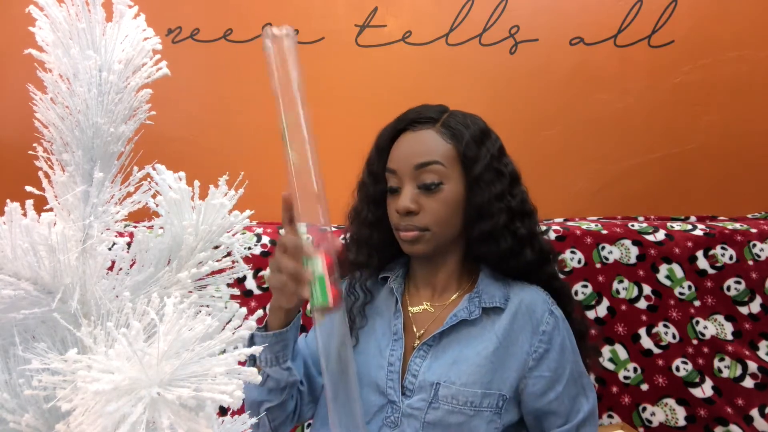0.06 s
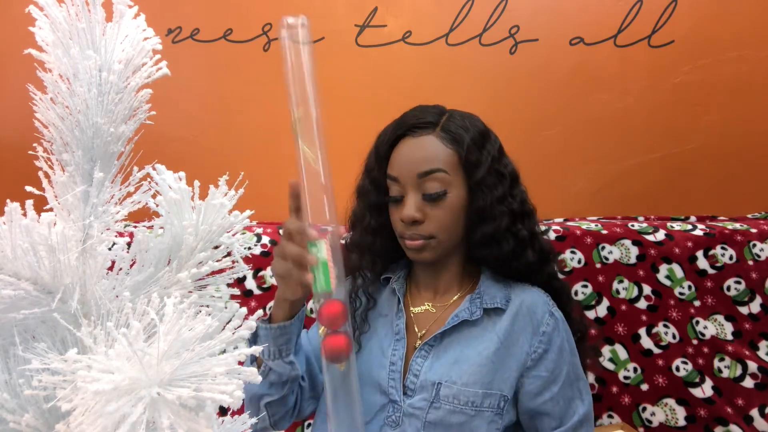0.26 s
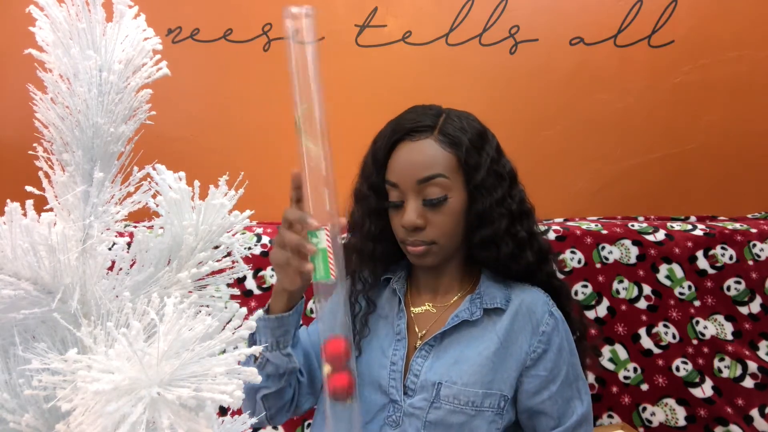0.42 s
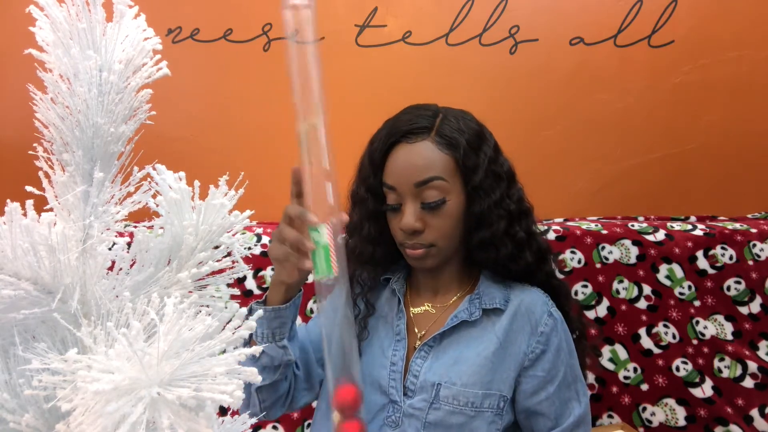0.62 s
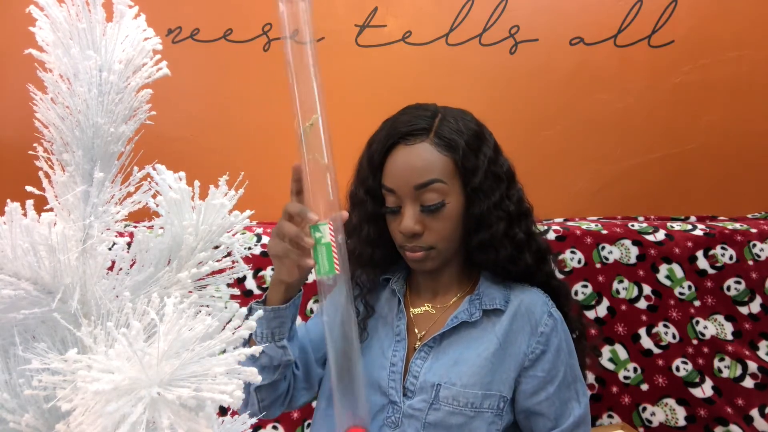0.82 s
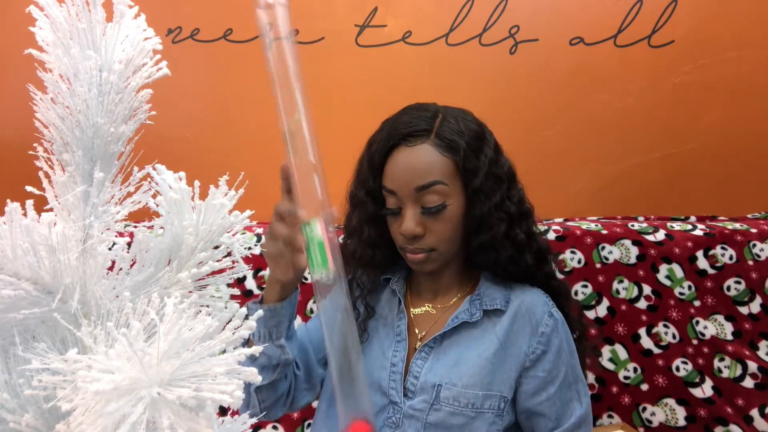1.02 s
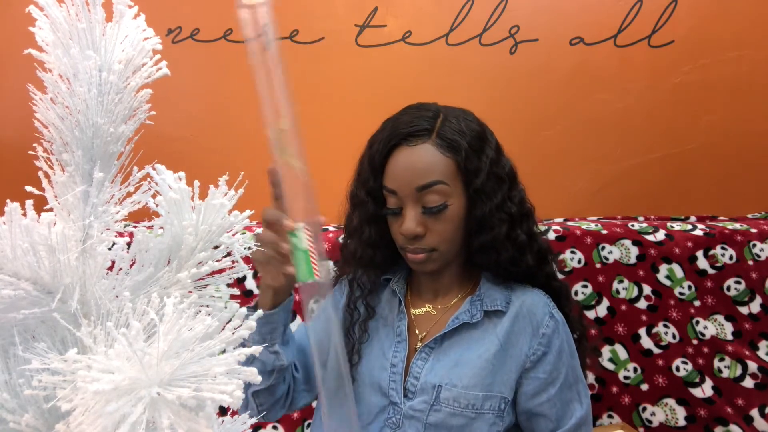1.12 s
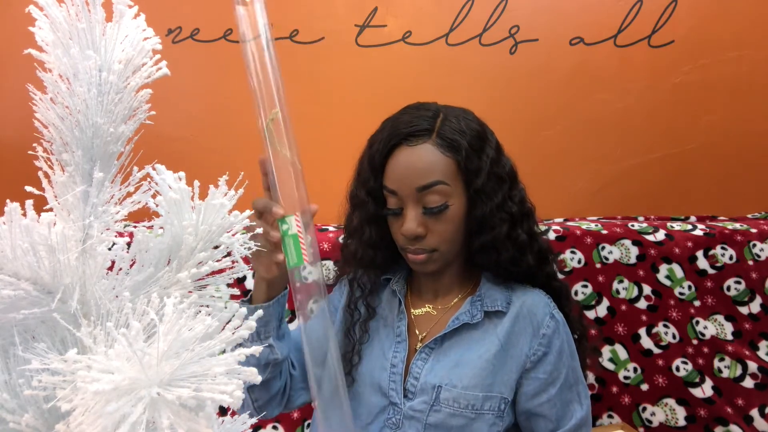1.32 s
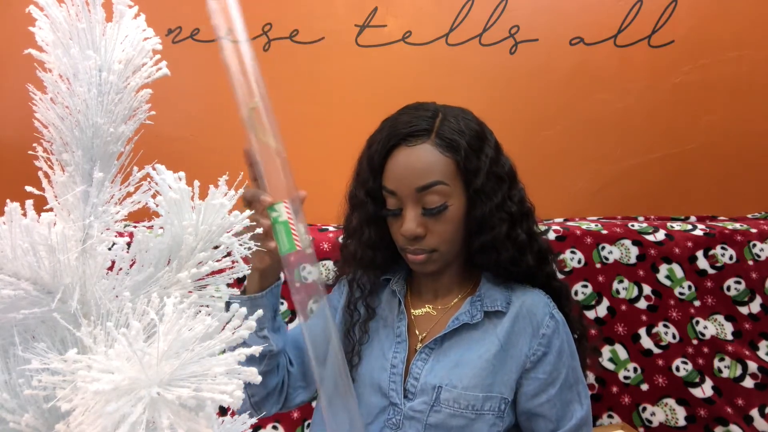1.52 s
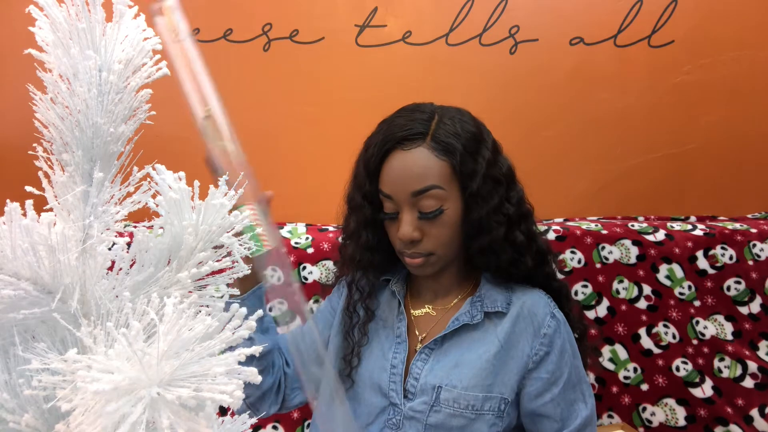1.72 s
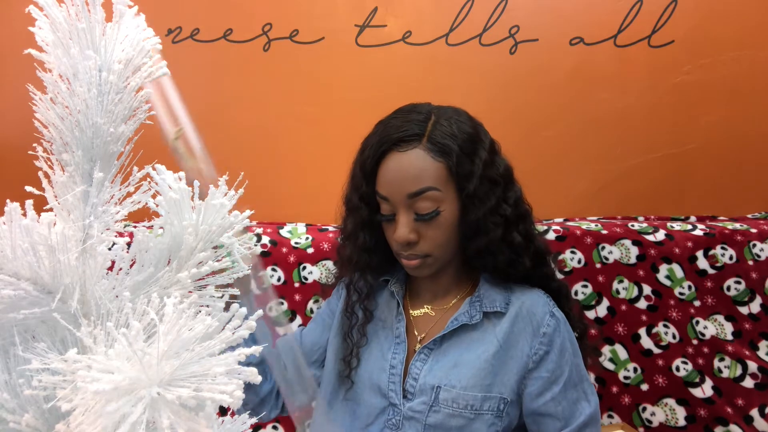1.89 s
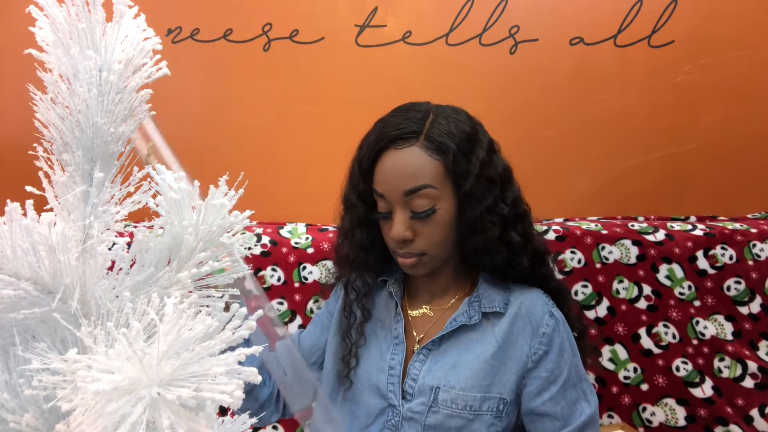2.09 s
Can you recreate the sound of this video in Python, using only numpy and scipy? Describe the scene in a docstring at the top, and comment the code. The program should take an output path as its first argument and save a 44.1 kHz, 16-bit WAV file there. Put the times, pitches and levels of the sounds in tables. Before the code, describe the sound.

Small hollow plastic balls knock and roll down a long plastic tube, then one clacks out

```python
"""Plastic balls in a long tube

Small hollow plastic ornament balls slip down a long plastic tube, tipped by hand in a quiet, small furnished room.
Their knocks, rolls and scrapes are clicks, tiny grains and noise that drive resonances, with echoes along the tube.
Near the end a ball drops out with a bright clack, chattering noise over a broad body; a few lighter ones follow.
"""
import sys
import numpy as np
from scipy import signal
from scipy.fft import rfft, irfft
from scipy.io import wavfile
from scipy.ndimage import uniform_filter1d, map_coordinates

SR = 44100
rng = np.random.default_rng(int(sys.argv[2]) if len(sys.argv) > 2 else 0)


def wav_out(sig):
    """Save sig, one row per channel (or a flat mono array), as 16-bit PCM at SR to the path in sys.argv[1]."""
    wavfile.write(sys.argv[1], SR, np.round(np.clip(np.atleast_2d(sig).T, -1, 1) * 32767).astype(np.int16))


N = 94815
TIME = np.arange(N) / SR  # s
CUTOFF_HZ = 16300  # top of the grains' bands; the microphone's top is cut just below

# Balls knock in the tube: (time [s], hollow pock level [dB], pock pitch [Hz],
# tube thud level [dB], thud pitch [Hz], shell click level [dB])
KNOCKS = [(.002, -33, 1550, -42.5, 407, -50), (0.0911, -27.5, 1780, -46, 443, -65),
          (0.2091, -18.5, 1800, -42, 480, -34.5), (0.2286, -23.5, 1780, -32.5, 463, -65.5),
          (0.381, -24, 1740, -35, 375, -36), (0.414, -7, 1730, -21, 385, -28),
          (0.5004, -38, 1780, -36, 336, -84), (0.5268, -25, 1800, -27.5, 359, -53),
          (0.5392, -25, 1820, -33, 390, -39.5), (0.603, -48, 1780, -26.5, 341, -41.5),
          (.637, -22, 1720, -34, 300, -63), (0.703, -31, 1900, -79, 347, -48),
          (0.7155, -2.5, 1780, -23.5, 337, -20), (0.7396, -7, 1740, -20, 338, -33),
          (0.7973, -14, 1810, -41, 347, -47.5), (0.8243, -14.5, 1760, -43, 302, -33.5),
          (0.8334, -17.5, 1800, -37.5, 314, -43.5), (0.97, -53, 1900, -47, 357, -85.5),
          (1.068, -42, 1780, -25, 363, -52), (1.0859, -24, 1790, -21, 331, -33.5),
          (1.1288, -15, 1810, -19.5, 331, -33.5), (1.1594, -17.5, 1950, -23.5, 356, -42),
          (1.1726, -23, 1900, -46, 360, -42)]
# Resonance of the hollow ball: (frequency [Hz], relative level [dB])
POCK_CURVE = [(100, -61.5), (700, -50.5), (1100, -33), (1400, -4.5), (1650, 4.5), (1900, 4.5), (2200, -6.5),
              (2500, -16.5), (3000, -49.5), (5000, -91.5)]
POCK_HZ = 1780  # centre of POCK_CURVE; the spot that is struck shifts it
# Resonance of the thin shell: (frequency [Hz], relative level [dB])
SHELL_CURVE = [(200, -52), (1000, -32.5), (3300, -20), (4600, 6), (5400, -19.5), (6900, -14.5), (7900, 7),
               (9000, -3.5), (9700, -0.5), (10600, -5), (11500, -3), (13700, -8), (16000, -21)]
# Bright crack of a hard hit: (frequency [Hz], relative level [dB])
CRACK_CURVE = [(200, -45.5), (1800, -35), (2300, -10.5), (2700, 2), (3700, -1), (4600, -1), (5500, -7),
               (6400, -1), (7100, -6), (7950, 8.5), (9000, -1.5), (11200, 0), (13500, -2.5), (16000, -13)]
# Broad body under the crack: (frequency [Hz], relative level [dB])
BODY_CURVE = [(30, -63), (80, -28), (200, -18), (400, -3.5), (800, -1.5), (1100, -6), (1400, -1.5),
              (1900, 1.5), (2600, -15), (4500, -50), (9000, -49)]


def from_db(db):
    """Decibels to gain."""
    return 10 ** (np.asarray(db) / 20)


def unit_energy(x):
    """Scale to a summed square of one."""
    return x / np.sqrt(np.sum(x ** 2) + 1e-20)


def at_hz(points, hz):
    """Read a table on a log-frequency axis."""
    f, value = np.transpose(points)
    return np.interp(np.log(np.maximum(hz, 1)), np.log(f), value)


def ring(x, spectrum, size=4096):
    """Drive a body with a resonance curve, as a causal minimum-phase response of unit energy."""
    gain = from_db(at_hz(spectrum, np.fft.rfftfreq(size, 1 / SR)))
    cepstrum = irfft(np.log(gain))
    # Folding the cepstrum onto positive time makes the response causal.
    cepstrum[1:size // 2] *= 2
    cepstrum[size // 2 + 1:] = 0
    response = unit_energy(irfft(np.exp(rfft(cepstrum))))
    return signal.fftconvolve(x, response)[:N]


def shifted(x, spectrum, ratio):
    """Drive a body whose resonances are all moved by one ratio."""
    return ring(x, [(hz * ratio, db) for hz, db in spectrum])


def blows(times, db):
    """One single-sample click for each contact."""
    out = np.zeros(N)
    places = np.clip(np.asarray(times) * SR, 0, N - 1).astype(int)
    out[places] = from_db(db)
    return out


def cracks(times, db, chatter_s):
    """A hard contact chatters as a burst of noise that swells until chatter_s, then dies."""
    out = np.zeros(N)
    for s, level_db, noise in zip(times, db, rng.standard_normal((len(times), 512))):
        age = np.arange(len(noise)) / SR / chatter_s
        burst = unit_energy(noise * age * np.exp(-age))
        i = int(s * SR)
        out[i:i + len(burst)] += from_db(level_db) * burst[:N - i]
    return out


def grains(per_s, spread_db, patchy_db, count=26):
    """Random tiny contacts, each in a narrow band; the favoured bands change as the contact moves; rms 1."""
    patch_s = .014  # spacing of the random changes in each band's level
    hz = np.fft.rfftfreq(N, 1 / SR)
    place = count * np.sqrt(hz / CUTOFF_HZ)
    out = 0
    for k in range(count + 1):
        sizes = from_db(spread_db * np.minimum(rng.exponential(1, N), 4))
        signs = rng.choice([-1, 1], N)
        favour = from_db(patchy_db * np.interp(TIME / patch_s, np.arange(N), rng.standard_normal(N)))
        hits = rng.random(N) < per_s / SR
        band = np.cos(np.pi / 2 * np.clip(place - k, -1, 1))
        out = out + band * rfft(sizes * signs * favour * hits)
    return unit_energy(irfft(out, N)) * np.sqrt(N)


def stroke(start, length, db, fade_db):
    """A quick attack, a hold whose level drifts by fade_db, and a short release."""
    attack_s, release_s = 0.011, 0.0065
    t = TIME - start
    held = from_db(db - fade_db * np.clip(t / length, 0, 1))
    attack = np.clip(t / attack_s, 0, 1)
    release = np.exp(-np.maximum(t - length, 0) / release_s)
    return held * attack * release


def still_air():
    """The quiet air of the room: steady noise with a spectral curve."""
    # (frequency [Hz], relative level [dB])
    air_curve = [(30, -22), (150, -9), (350, 3), (900, -17.5), (4000, -27), (16000, -24.5)]
    return from_db(-95) * ring(rng.standard_normal(N), air_curve)


def room(x, size=16384, count=14):
    """A diffuse tail that builds up after a short gap and dies at its own rate in each band."""
    # Time to fall 60 dB: (frequency [Hz], time [s])
    decay_times = [(200, .22), (550, 0.14), (1700, 0.19), (4000, .175), (10000, .17), (16000, .14)]
    delay_s, build_s = .003, 0.003
    t, hz = np.arange(size) / SR, np.fft.rfftfreq(size, 1 / SR)
    build = np.clip((t - delay_s) / build_s, 0, 1)
    white, tail = rfft(rng.standard_normal(size)), 0
    edges = np.append(0, np.geomspace(250, SR / 2, count))
    for low, high in zip(edges, edges[1:]):
        band = irfft(white * ((hz >= low) & (hz < high)))
        fade = from_db(-60 * t / at_hz(decay_times, (low + high) / 2))
        share = np.sqrt(2 * (high - low) / SR)  # energy in proportion to bandwidth
        tail = tail + unit_energy(band * fade * build) * share
    return signal.fftconvolve(x, tail)[:N]


def tube_echo(x, reflection, count=7):
    """Sound runs to and fro along the air in the tube, weaker on each trip."""
    round_trip_s = .00375
    lag = int(round_trip_s * SR)
    return sum(reflection ** k * np.pad(x, (k * lag, 0))[:N] for k in range(count))


def sliding():
    """Even friction hisses in resonances of the tube wall, which glide as the ball travels."""
    # Smooth slides: (time [s], length [s], level [dB], fade over the length [dB])
    slides = [(1.281, .07, -65, -6), (1.36, 0.16, -65, -2)]
    # Tube wall: (frequency [Hz], relative level [dB])
    wall_curve = [(200, -54), (600, -22), (850, -20), (1200, -31), (2000, -14), (2600, -27), (3200, -7),
                  (3650, 6), (4300, -12), (6600, -10), (8500, -30), (16000, -38)]
    # Main wall resonance along the way: (time [s], pitch [Hz])
    glide = [(1.27, 3720), (1.36, 3480), (1.44, 3600), (1.5, 3850)]
    wall_hz = 3600  # centre of wall_curve
    hiss = ring(rng.standard_normal(N), wall_curve)
    # Reading the hiss faster or slower moves its resonances.
    place = np.cumsum(np.interp(TIME, *np.transpose(glide)) / wall_hz)
    return map_coordinates(hiss, [place], mode="wrap") * sum(stroke(*row) for row in slides)


def rubbing():
    """Dense grains, mostly plastic rubbing on plastic, drive resonances of the tube wall and the shells."""
    # Rubs, and at 1.828 s a faint noisy swell just before the big clack; before the trim in the scene:
    # (time [s], length [s], scrape level [dB], shell hiss level [dB], fade over the length [dB])
    rubs = [(0.005, 0.075, -75, -80, -2.5), (0.113, 0.1, -55.5, -60, 6), (0.233, 0.085, -43, -50, 10),
            (0.348, 0.03, -59, -82, 0), (0.425, 0.039, -53.5, -46.5, 14), (0.531, 0.069, -59.5, -58.5, 3),
            (0.66, 0.054, -67, -70, -1.5), (0.726, 0.034, -90, -50, 3), (0.767, 0.09, -46, -52, 17),
            (1.031, 0.069, -64.5, -99.5, 0.5), (1.071, 0.057, -61, -63.5, -7),
            (1.126, 0.067, -55, -57.5, -2), (1.192, 0.11, -50.5, -69, 18.5), (1.298, 0.035, -62, -64, -5),
            (1.383, 0.064, -64.5, -70, -4), (1.476, 0.035, -72, -44.5, 17), (1.828, 0.02, -67, -69, -8),
            (2.006, 0.055, -82, -56, 18)]
    # A sliding ball's shell sings, before the same trim: (time [s], length [s], level [dB])
    squeaks = [(1.697, 0.032, -57), (1.955, 0.057, -60)]
    # Scraped tube wall: (frequency [Hz], relative level [dB])
    scrape_curve = [(100, -53.5), (500, -18), (880, -16.5), (1200, -46), (2000, -8.5), (2700, -14.5),
                    (3600, -1), (4500, -3), (5400, -5.5), (6500, -4.5), (7400, -13.5), (10000, -30.5),
                    (16000, -33)]
    # Singing shell: (frequency [Hz], relative level [dB])
    squeak_curve = [(200, -68.5), (1500, -39.5), (2800, -38), (3600, 3.5), (4300, 1), (4570, 10.5),
                    (4850, -13.5), (5300, -19), (6500, -12), (7400, -12), (7750, 1.5), (8000, 6.5),
                    (8400, -15.5), (9500, -19.5), (11500, -29.5), (16000, -32)]
    slips = grains(per_s=560, spread_db=3.5, patchy_db=5.5)  # per_s counts each band
    scrape = sum(stroke(s, length, db, fade) for s, length, db, _, fade in rubs)
    hiss = sum(stroke(s, length, db, fade) for s, length, _, db, fade in rubs)
    squeak = sum(stroke(s, length, db, fade_db=7) for s, length, db in squeaks)
    wall = ring(slips * scrape, scrape_curve)
    return wall + ring(slips * hiss, SHELL_CURVE) + ring(slips * squeak, squeak_curve)


def thud(x, pitch_hz):
    """The air and wall of the tube answer at a pitch set by where the ball is."""
    # (frequency [Hz], relative level [dB])
    thud_curve = [(30, -47.5), (75, -48), (130, -16.5), (240, -11), (360, 7), (520, -10.5), (780, -19),
                  (1050, -37.5), (2500, -61)]
    return shifted(x, thud_curve, pitch_hz / 338.4)  # 338.4 Hz: centre of the curve


def rolling():
    """Small bumps of a rolling ball drive the same hollow resonances as the knocks."""
    # Rolls along the wall, before the trim in the scene: (time [s], length [s], hollow pock level [dB],
    # tube thud level [dB], thud pitch [Hz], fade over the length [dB])
    rolls = [(0, 0.078, -57.5, -66, 420, 20), (0.079, 0.096, -57, -67.5, 383, 9),
             (0.159, 0.087, -88, -66.5, 417, -15), (0.234, 0.048, -41, -45.5, 548, 10.5),
             (0.283, 0.057, -60.5, -59, 356, 0), (0.415, 0.046, -40.5, -53, 420, 3),
             (0.479, 0.048, -47.5, -45.5, 349.5, 17.5), (.54, 0.085, -49.5, -49, 400, 7),
             (0.668, 0.099, -61, -75, 280, 4), (0.753, 0.099, -48.5, -57.5, 356.4, 0),
             (1.034, 0.083, -87.5, -63.5, 392, 13.5), (1.09, 0.081, -56.5, -62, 342, -6),
             (1.195, 0.042, -59.5, -65.5, 366.6, 2), (1.27, 0.064, -88.5, -62, 368, 3),
             (1.405, .05, -68, -77, 851, 4), (1.477, 0.05, -69, -66, 560, 10),
             (2.103, 0.03, -70.5, -56, 375, 16)]
    bumps = grains(per_s=300, spread_db=3.5, patchy_db=2.5)
    pock = sum(stroke(s, length, db, fade) for s, length, db, _, _, fade in rolls)
    thuds = sum(thud(bumps * stroke(s, length, db, fade), hz) for s, length, _, db, hz, fade in rolls)
    return ring(bumps * pock, POCK_CURVE) + thuds


def ticking():
    """The thin shell clicks on each knock, and short pitched pings of the shell sound among the knocks and clacks."""
    # Short pitched pings of the thin shell, spread from 3 to 6.2 kHz, most between 3.5 and 4.7 kHz; the one at
    # 2.0553 s is # the pitched part of the light clack there: (time [s], level [dB], pitch [Hz])
    ticks = [(0.0841, -33, 3780), (0.1896, -30, 3720), (.2265, -30, 3550), (0.247, -27, 4650),
             (.3632, -33, 3490), (0.3802, -25, 4650), (.4311, -29, 4600), (0.48, -36, 4200),
             (0.5668, -33, 3720), (0.58, -33, 5600), (.741, -35, 4660), (.7743, -28, 3950),
             (.783, -28, 6200), (1.174, -23, 4100), (1.459, -38, 3700), (2.0553, -27, 4400),
             (2.0958, -18.5, 4550), (2.109, -35, 3000)]
    # Ping of the shell: (frequency [Hz], relative level [dB])
    ping_curve = [(500, -42), (2500, -19), (4000, -9), (4600, 8), (5200, -10), (8000, -14), (16000, -32)]
    ping_hz = 4600  # centre of ping_curve
    s, *_, shell_db = np.transpose(KNOCKS)
    clicks = ring(cracks(s, shell_db, chatter_s=0.0033), SHELL_CURVE)
    pings = sum(shifted(cracks([at], [db], chatter_s=0.0008), ping_curve, hz / ping_hz)
                for at, db, hz in ticks)
    return clicks + pings


def knocking():
    """Each knock sounds the hollow ball and the tube, each at a pitch of its own."""
    out = np.zeros(N)
    for s, pock_db, pock_hz, thud_db, thud_hz, _ in KNOCKS:
        out += shifted(blows([s], pock_db), POCK_CURVE, pock_hz / POCK_HZ)
        out += thud(blows([s], thud_db), thud_hz)
    return out


def ringing():
    """Light touches leave the shell of a free ball ringing on a few clear modes."""
    # Touches that set it ringing: (time [s], level [dB])
    touches = [(1.708, -64.5), (1.974, -66), (2.004, -71), (2.0956, -56), (2.143, -50)]
    # Shell modes: (frequency [Hz], relative level [dB], time to fall 60 dB [s])
    modes = [(4600, -2, .085), (7825, -6, .07), (7570, -9, .07)]
    touch_s = 0.0019  # a soft touch lets the ring swell
    shell = sum(from_db(db - 60 * TIME / t60) * np.sin(2 * np.pi * hz * TIME) for hz, db, t60 in modes)
    swell = (1 - np.exp(-TIME / touch_s)) ** 2
    return signal.fftconvolve(blows(*np.transpose(touches)), shell * swell)[:N]


def skittering():
    """The dropping ball skitters over the rim: a fine crackle of tiny contacts joins the big clack."""
    # (time [s], length [s], level [dB], fade over the length [dB])
    skitter = (1.85, .02, -47, -1)
    contacts = grains(per_s=130, spread_db=3, patchy_db=2) * stroke(*skitter)
    return ring(contacts, CRACK_CURVE) + from_db(-2.5) * ring(contacts, BODY_CURVE)


def clacking():
    """Hard hits in the open: a bright crack of the shell over a broad body."""
    # (time [s], bright crack level [dB], body level [dB])
    clacks = [(1.4795, -39, -41), (1.488, -36, -46), (1.844, -35, -48), (1.8502, -15, -23),
              (1.8598, -9.5, -18.5), (1.8626, -11, -21), (1.865, -17, -15), (1.9727, -31.5, -43.5),
              (2.055, -21.5, -70), (2.0957, -29.5, -33), (2.1024, -33, -38)]
    s, crack_db, body_db = np.transpose(clacks)
    bright = ring(cracks(s, crack_db, chatter_s=0.0006), CRACK_CURVE)
    return bright + ring(blows(s, body_db), BODY_CURVE)


def scene():
    """The tube and the clacks in a small furnished room, over its still air."""
    # The hollow, low part echoes strongly in the tube; the treble echoes weakly.
    hollow = tube_echo(knocking() + from_db(-2) * rolling(), reflection=0.37)
    treble = tube_echo(ticking() + from_db(-4.5) * rubbing() + sliding(), reflection=.15)
    tube = hollow + treble
    clacks = clacking() + skittering() + ringing()
    reverberation = room(from_db(-6.5) * tube + from_db(-1.5) * clacks)
    return (tube + clacks + reverberation + still_air())[None]


def record(dry):
    """A noise suppressor turns down the quietest tails; the top is cut steeply."""
    threshold_db, slope, depth_db = -70, .5, 7  # slope: dB of cut per dB below the threshold
    window_s = .02
    power = np.abs(uniform_filter1d(dry ** 2, int(window_s * SR)))
    level_db = 10 * np.log10(power + 1e-18)
    gated = dry * from_db(np.clip(slope * (level_db - threshold_db), -depth_db, 0))
    top_cut = signal.ellip(10, .3, 80, CUTOFF_HZ - 400, fs=SR, output="sos")
    return signal.sosfilt(top_cut, gated)


dry = scene()
out = record(dry)
wav_out(out)
```